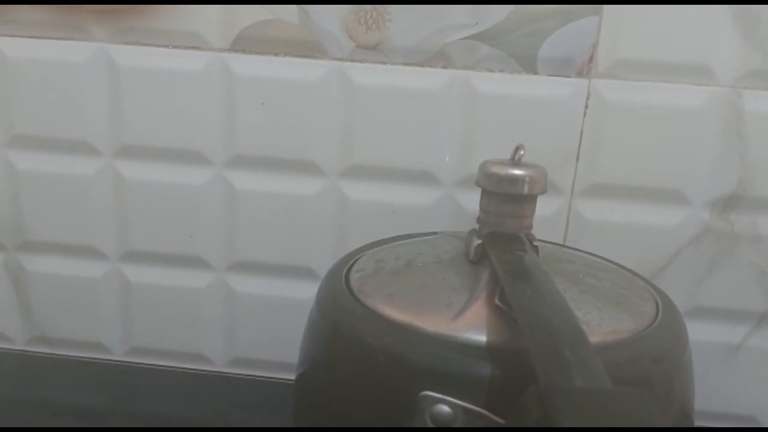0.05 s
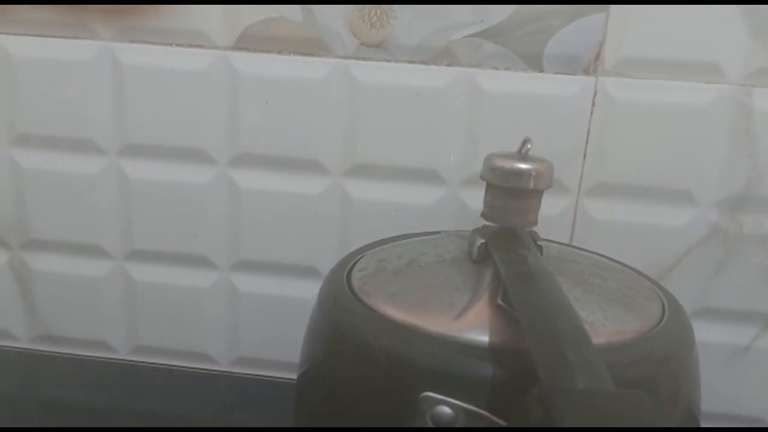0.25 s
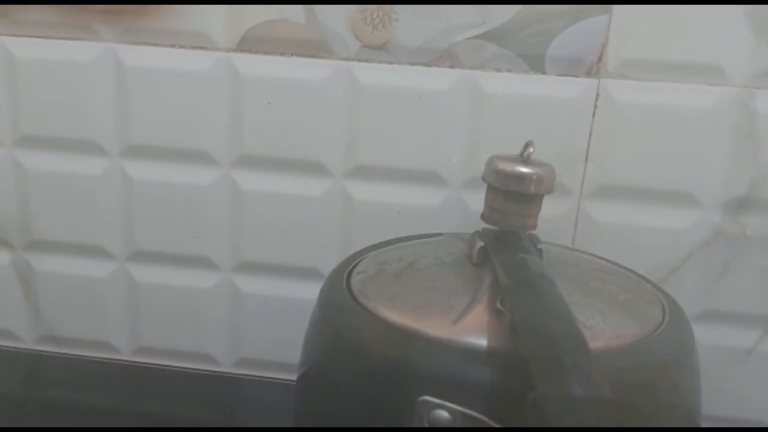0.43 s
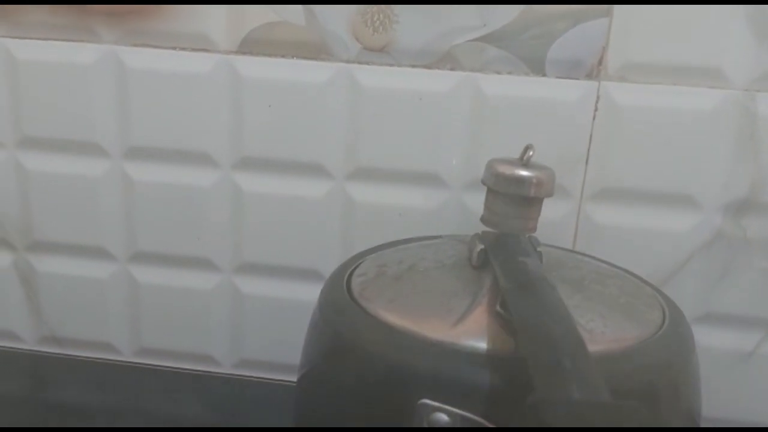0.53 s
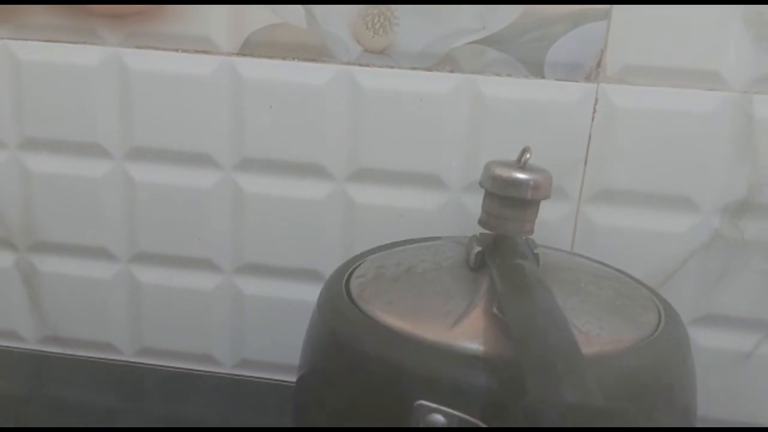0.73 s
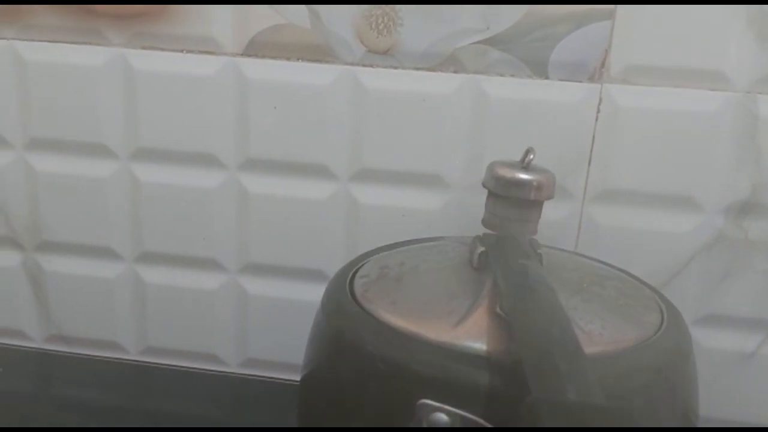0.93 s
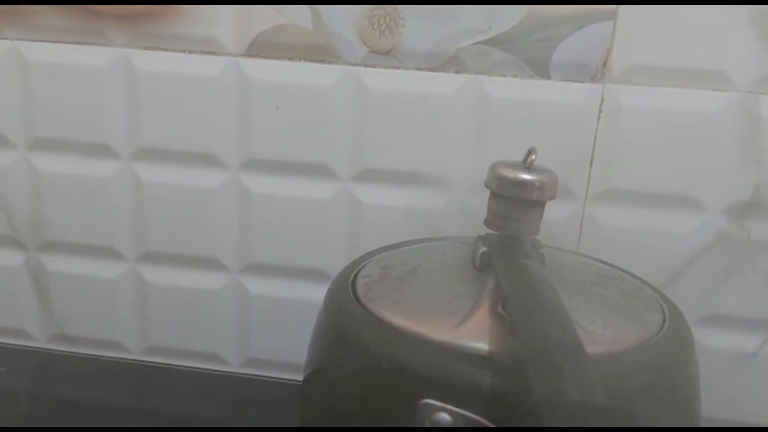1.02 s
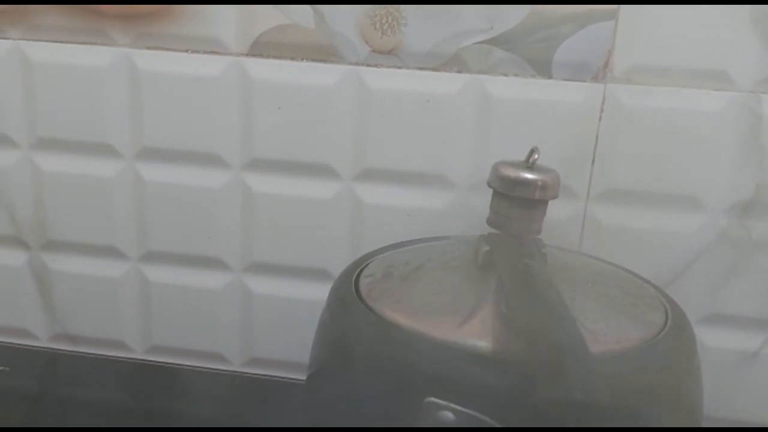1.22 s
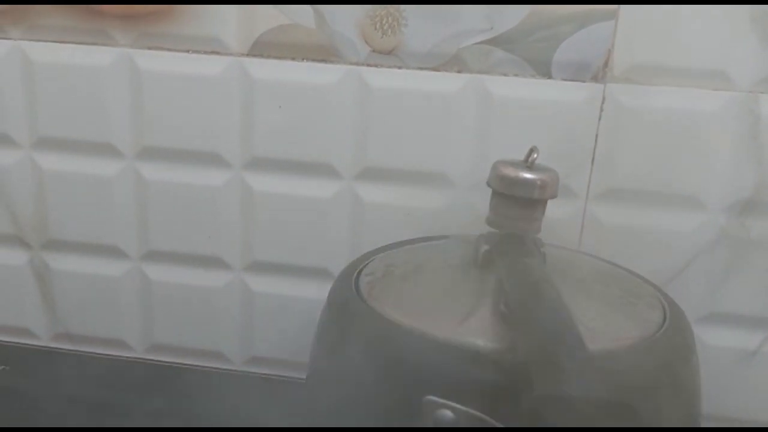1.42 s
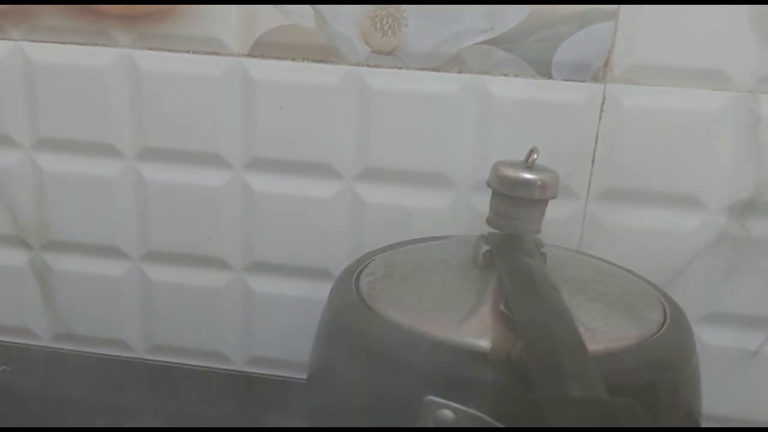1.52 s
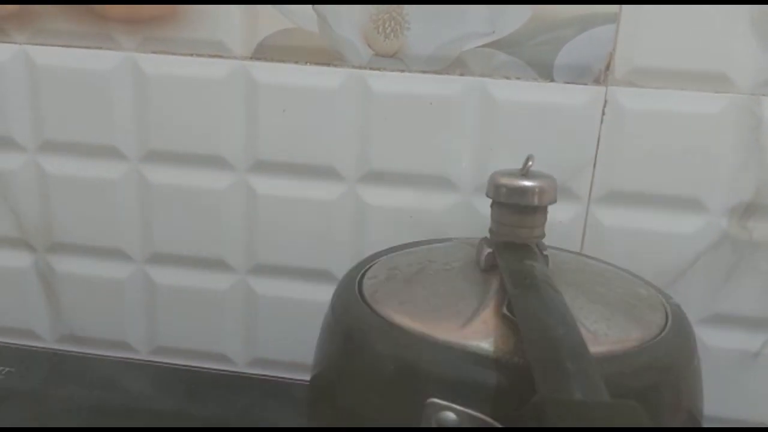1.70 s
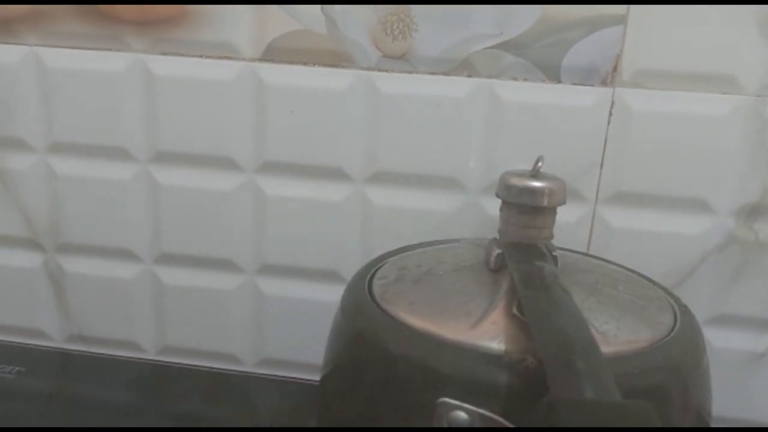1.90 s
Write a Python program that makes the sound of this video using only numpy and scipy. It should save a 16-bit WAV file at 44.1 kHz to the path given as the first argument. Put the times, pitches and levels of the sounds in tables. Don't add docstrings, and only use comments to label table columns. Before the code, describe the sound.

Faint leak and room noise open, with steam swelling from 0.1 s and sputtering in rapid spurts at 0.19-0.35 s. A loud, very bright pressure cooker hiss then holds until about 1.6 s, with windy buffeting at the close phone microphone, stronger on the left. It collapses by 1.75 s with soft valve puffs, a brief spit and short tiled-room tail, then quiet room noise and faint rising hum.

```python
import sys
import numpy as np
from scipy import signal
from scipy.fft import rfft, irfft
from scipy.io import wavfile
from scipy.ndimage import uniform_filter1d

SR = 44100
rng = np.random.default_rng(int(sys.argv[2]) if len(sys.argv) > 2 else 0)


def log_audio(samples):
    frames = np.atleast_2d(samples).T
    limited = np.clip(frames, -1, 1)
    pcm = np.round(limited * 32767).astype(np.int16)
    wavfile.write(sys.argv[1], SR, pcm)


def voltage_ratio(decibels):
    exponent = np.asarray(decibels, float) / 20
    return 10 ** exponent


N = 85995


def unit(x):
    return x / np.sqrt(np.mean(x ** 2))


def walk(rate):
    hold = int(SR / rate)
    steps = np.repeat(rng.standard_normal(N // hold + 1), hold)
    return 1.3 * uniform_filter1d(uniform_filter1d(steps, hold), hold)[:N]


def turbulence(colour, flicker_db, rate, shared_db, shared_rate, channels=1, likeness=0.):
    hz = np.maximum(np.arange(N // 2 + 1) * SR / N, 1)
    colour_hz, colour_db = np.array(colour, float).T
    white = rng.standard_normal((channels + 1, N))
    likeness = np.clip(likeness, 0, 1)
    white = np.sqrt(likeness) * white[:1] + np.sqrt(1 - likeness) * white[1:]
    spectrum = rfft(white) * voltage_ratio(np.interp(np.log(hz), np.log(colour_hz), colour_db, left=-90))
    place = np.clip(2 * np.log2(hz / 40), 0, 18)
    out = 0
    for k in range(19):
        band = irfft(spectrum * np.maximum(1 - np.abs(place - k), 0), N)
        out = out + band * voltage_ratio(flicker_db * walk(rate))
    return unit(out * voltage_ratio(shared_db * walk(shared_rate)))


def ring(hz, width_hz):
    b, a = signal.iirpeak(hz, hz / width_hz, SR)
    return unit(signal.lfilter(b, a, rng.standard_normal((2, N))))


def valve_flow(t):
    # (time [s], jet level [dB])
    flow = [(0, -48), (.1, -38), (.17, -31.5), (.25, -26), (.285, -18.5), (.305, -16), (.4, -14),
            (.52, -13), (.66, -12.5), (1.2, -14), (1.58, -14), (1.65, -20), (1.72, -26), (1.738, -37),
            (1.752, -28), (1.782, -32.5), (1.8, -47), (1.84, -60)]
    # (time [s], boost [dB], decay [s])
    sputters = [
        (0.191, 11.5, 0.011),
        (.229, 9, 0.016),
        (0.264, 11, 0.0089),
        (.289, 5.5, 0.043),
        (0.344, 6, .02),
    ]
    rise_s = .002
    flow_db = np.interp(t, *np.array(flow).T)
    for at, boost_db, decay_s in sputters:
        age = np.maximum(t - at, 0)
        flow_db = flow_db + boost_db * (1 - np.exp(-age / rise_s)) * np.exp(-age / decay_s)
    return flow_db


def vent_pipe(t, flow_db):
    # (frequency [Hz], width [Hz], level re jet [dB], loss once the valve is open [dB])
    pipe_modes = [
        (4654, 580, -16.5, 1),
        (7580, 380, -14.5, 5.5),
    ]
    open_s, top_db, flow_share = 0.3, -11.5, 0.94
    opened = np.clip((t - open_s) / .1, 0, 1)
    pipe = 0
    for hz, width_hz, db, lost_db in pipe_modes:
        pipe = pipe + ring(hz, width_hz) * voltage_ratio(db - lost_db * opened + 2.8 * walk(11.8))
    return pipe * voltage_ratio(top_db + flow_share * (flow_db - top_db))


def jet(t):
    # (frequency [Hz], level [dB])
    hiss_colour = [(300, -33), (2200, -18.5), (6000, -12), (8800, -12.5), (10200, -2), (11500, 1),
                   (14200, 0.5), (16000, -2.5)]
    weak_pan_db, full_db = 10.5, -11.5
    flow_db = valve_flow(t)
    hiss = turbulence(hiss_colour, 0.4, 15.86, 0.89, 29.8, channels=2, likeness=0.45) * voltage_ratio(flow_db)
    pan_db = weak_pan_db * np.clip((full_db - flow_db) / 30, 0, 1)
    return (hiss + vent_pipe(t, flow_db)) * voltage_ratio(np.array([pan_db, -pan_db]) / 2)


def shade_left(steam):
    shade_hz, width_hz, share = 10480, 1900, 0.15
    b, a = signal.iirpeak(shade_hz, shade_hz / width_hz, SR)
    shade = signal.filtfilt(b, a, steam[0])
    return steam - share * shade * np.array([[1], [0]])


def tiles(x):
    t60_s, tail_db = .45, -20
    age = np.arange(SR // 2) / SR
    decay = np.exp(-np.log(1000) * age / t60_s) * (age > .004)
    tail = rng.standard_normal((2, len(age))) * decay
    tail = tail / np.sqrt(np.sum(tail ** 2, axis=1, keepdims=True))
    return signal.fftconvolve(x, tail, axes=1)[:, :N] * voltage_ratio(tail_db)


def blast(t):
    # (time [s], level [dB], left minus right [dB])
    gusts = [(.2, -51, -2), (.25, -52.5, 3), (.262, -42.5, 0), (.33, -33, 3), (.365, -27.5, 5),
             (.398, -19, 9), (.51, -19.5, 9.5), (.65, -19.5, 5), (.95, -18.5, 10), (1.08, -17, 8),
             (1.18, -17, 10), (1.3, -22.5, -2.5), (1.4, -18.5, 6), (1.585, -19, 15), (1.605, -27.5, 12),
             (1.64, -27.5, 15), (1.66, -43, 3), (1.75, -52, -2)]
    # (frequency [Hz], level [dB])
    left_colour = [(30, -16), (60, -0.5), (240, -0.5), (500, -5), (2000, -8.5), (4500, -15.5), (6000, -24),
                   (10000, -46)]
    # (frequency [Hz], level [dB])
    right_colour = [(30, -22), (60, -6), (240, 0.5), (500, -3), (2000, -7), (4500, -12), (6000, -22),
                    (10000, -16.5)]
    at, db, pan_db = np.array(gusts).T
    outside_s = np.maximum(at[0] - t, 0) + np.maximum(t - at[-1], 0)
    level_db = np.interp(t, at, db) - 90 * outside_s
    left_gain = 1 / np.sqrt(1 + voltage_ratio(-2 * np.interp(t, at, pan_db)))
    right_gain = np.sqrt(1 - left_gain ** 2)
    left = turbulence(left_colour, 0.74, 15, 1.32, 19.9)[0] * left_gain
    right = turbulence(right_colour, 1.2, 13.7, 0.5, 18.7)[0] * right_gain
    return 2 * voltage_ratio(level_db) * np.array([left, right])


def weight_puffs(t):
    # (time [s], centre frequency [Hz], level [dB])
    knocks = [
        (.261, 1500, -41),
        (.291, 1800, -36),
        (1.635, 1400, -37),
        (1.734, 2300, -45),
    ]
    length_s, width_hz = .007, 1500
    puffs = 0
    for at, hz, db in knocks:
        puffs = puffs + ring(hz, width_hz) * voltage_ratio(db) * np.exp(-((t - at) / length_s) ** 2)
    return puffs


def room_noise(t):
    # (frequency [Hz], level [dB])
    room_colour = [(30, -36), (110, -25), (300, -15), (900, -27), (2300, -20), (5500, -27), (7500, -14),
                   (10300, -14)]
    room_colour = list(room_colour) + [(11500, -21), (16000, -24)]
    end_db, fade_db_s = -46.5, 2
    floor = turbulence(room_colour, 1.5, 12, .7, 3, channels=2, likeness=.3)
    return floor * voltage_ratio(end_db - fade_db_s * (t - t[-1]))


def appliance_hum(t):
    start_hz, glide_hz_s, hum_db, from_s = 570, 150, -60, 1.8
    hz = start_hz + glide_hz_s * (t - from_s) + 5 * walk(30)
    tone = np.sin(2 * np.pi * np.cumsum(hz) / SR)
    return tone * voltage_ratio(hum_db + 2 * walk(24.4)) * np.clip((t - from_s) / 0.033, 0, 1)


def draught(t):
    start_db, fade_db_s = -52, 14
    return ring(90, 70) * voltage_ratio(start_db - fade_db_s * t)


def kitchen(t):
    pan_db = 7
    sides = voltage_ratio(np.array([[.5], [-.5]]) * pan_db)
    return (room_noise(t) + appliance_hum(t) + weight_puffs(t)) * sides + draught(t)


def treble_dropouts(x):
    mid_from_hz, side_from_hz, top_hz, band_hz = 4800, 8200, 15720, SR / 64
    mid_share, mid_drop_db, side_share, side_drop_db, wobble_db = .09, -13, .62, -26, 1.5
    mid_side = np.array([x[0] + x[1], x[0] - x[1]]) / 2
    hz, at, spectrum = signal.stft(mid_side, SR, nperseg=1024)
    band = (hz / band_hz).astype(int)
    frame = (np.arange(len(at)) + 1) // 2
    cells = (band[-1] + 1, frame[-1] + 1)
    luck, wobble = rng.random(cells), rng.standard_normal((2, *cells))
    spell = uniform_filter1d(rng.standard_normal(cells), size=2)
    spell = np.argsort(np.argsort(spell)) / cells[1] / side_share
    mid_db = mid_drop_db * (luck < mid_share) * (.5 + luck / mid_share)
    side_db = side_drop_db * np.clip(2 * (1 - spell), 0, 1)
    db = (np.array([mid_db, side_db]) + wobble_db * wobble)[:, band][:, :, frame]
    treble = hz[:, None] > np.array([mid_from_hz, side_from_hz])[:, None, None]
    masked = spectrum * voltage_ratio(db * treble) * (hz[:, None] < top_hz)
    mid, side = signal.istft(masked, SR, nperseg=1024)[1][:, :N]
    return np.array([mid + side, mid - side])


def scene():
    t = np.arange(N) / SR
    steam = shade_left(jet(t))
    return steam + tiles(steam) + blast(t) + kitchen(t)


def band_limit(x):
    return signal.sosfilt(signal.butter(12, 16840, fs=SR, output="sos"), x)


def record(dry):
    ceiling = .9
    rounded = dry / (1 + (dry / ceiling) ** 4) ** .25
    mix = treble_dropouts(rounded)
    return band_limit(mix)


dry = scene()
out = record(dry)
log_audio(out)
```